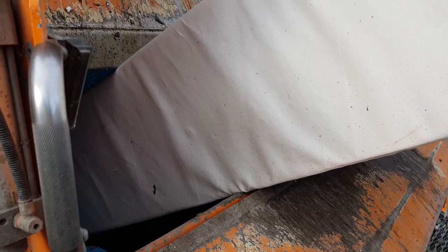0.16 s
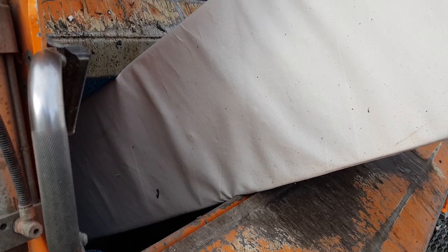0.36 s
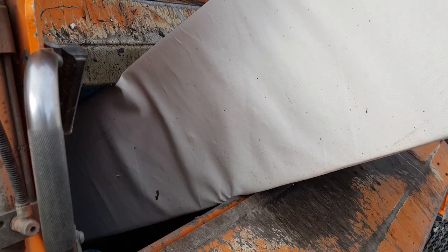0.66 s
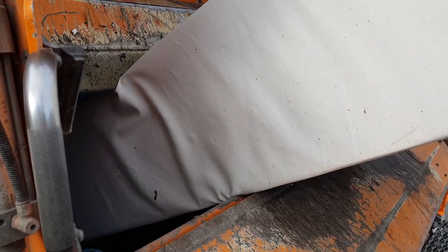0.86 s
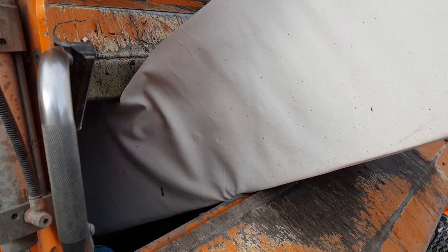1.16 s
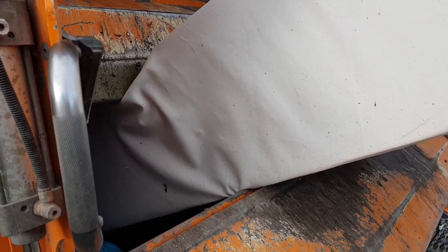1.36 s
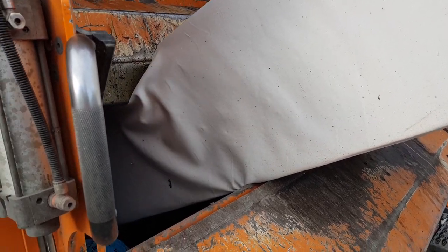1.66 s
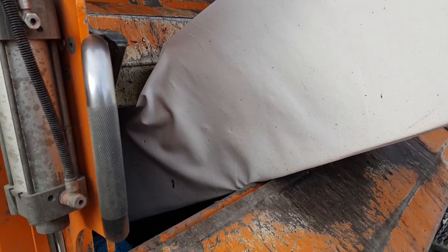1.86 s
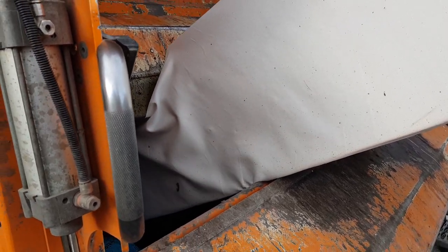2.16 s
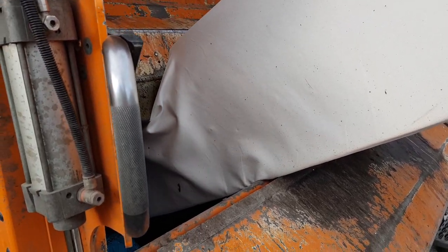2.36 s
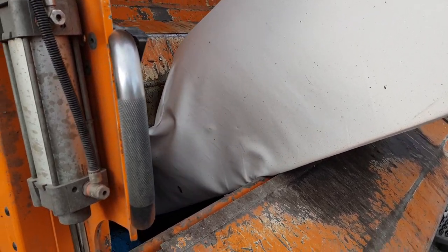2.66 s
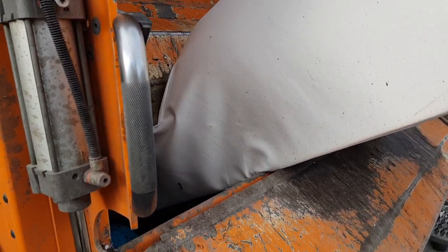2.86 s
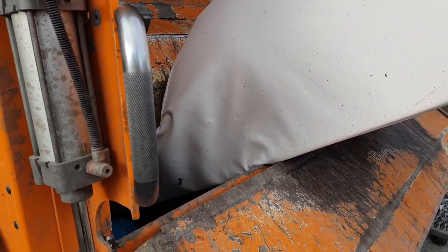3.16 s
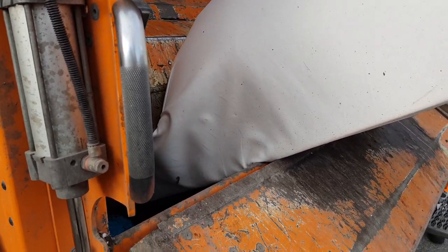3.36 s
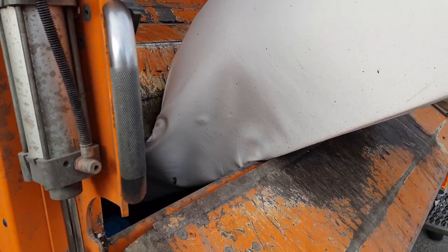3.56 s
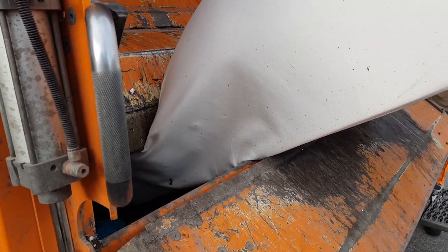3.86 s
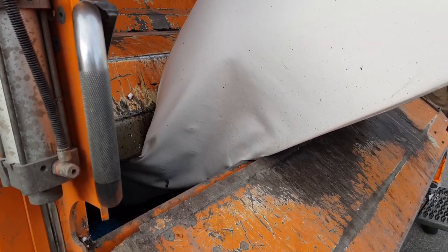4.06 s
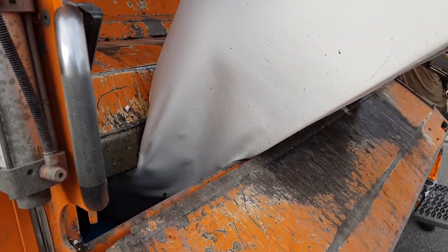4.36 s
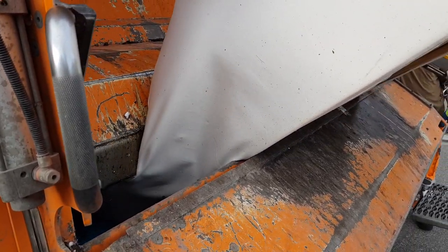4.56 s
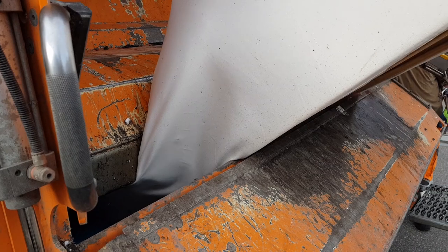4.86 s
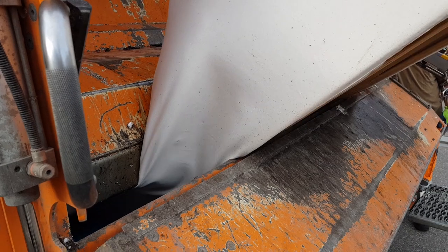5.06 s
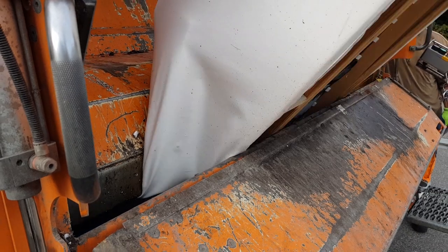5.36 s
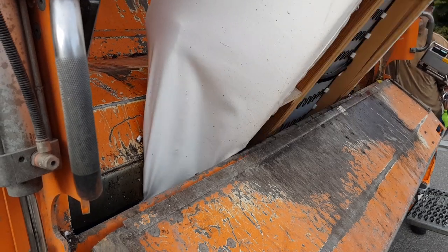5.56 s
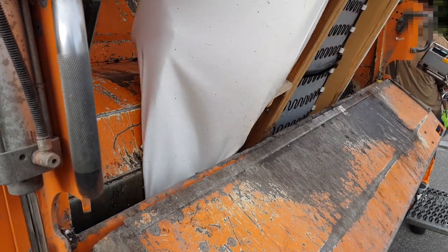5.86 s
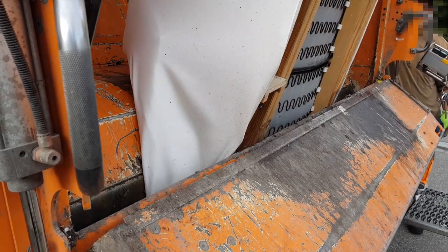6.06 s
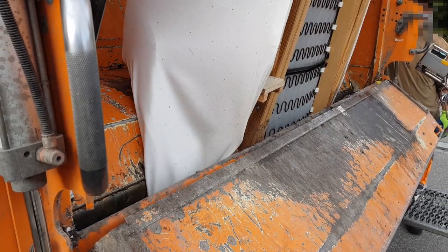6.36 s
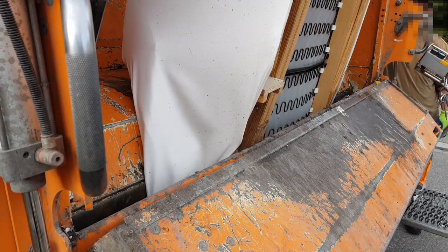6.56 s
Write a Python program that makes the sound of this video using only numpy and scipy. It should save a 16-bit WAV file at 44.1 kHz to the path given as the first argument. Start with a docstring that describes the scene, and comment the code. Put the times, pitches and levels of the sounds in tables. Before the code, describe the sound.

Wooden slats crack, crunch and splinter as a refuse truck's press crushes a cloth-covered bed base, over low engine rumble and faint pump whine.

```python
"""Wooden slats break as a refuse truck's packer blade crushes a cloth-covered bed base, heard beside the hopper.
Each break is a burst of fibre fractures that ring in the steel hopper; splinters add short, bright snaps.
Crushed pieces crunch as random tiny fractures, a joint creaks in noisy jerks and the frame groans in rough tones.
Cloth drags as dense, dull catches and panels boom as dying low tones.
Behind them, shaped noise and steady tones make the engine rumble, pump whine and oil hiss."""
import sys
import numpy as np
from scipy import signal
from scipy.fft import rfft, irfft
from scipy.io import wavfile

SR = 44100
rng = np.random.default_rng(int(sys.argv[2]) if len(sys.argv) > 2 else 0)


def to_wav(s):
    """Save 16-bit WAV."""
    ch = np.atleast_2d(s).T  # columns
    pcm = np.round(np.clip(ch, -1, 1) * 32767)  # PCM
    wavfile.write(sys.argv[1], SR, pcm.astype(np.int16))


N = 296352
TIME = np.arange(N) / SR  # seconds

# Levels in the tables are settings; the functions may add small trims to them.
# engine and chassis under load: (time [s], rumble level [dB], panel drone level [dB])
ENGINE_LOAD = [(0.0, -35, -37.5), (0.22, -22.5, -28.5), (0.99, -37, -27.5), (1.36, -30.5, -32.5),
               (1.53, -39, -38), (1.72, -31, -27), (2.43, -32, -37.5), (2.86, -33, -33),
               (4.2, -38.5, -27.5), (4.33, -35, -34.5), (4.75, -29.5, -26.5), (5.4, -28.5, -26),
               (5.93, -58, -25), (6.1, -36, -29), (6.31, -40, -40.5), (6.61, -22, -26.5),
               (6.72, -51, -31.5)]
# engine and pump effort: (time [s], firing tone level [dB], change of pump sound [dB])
ENGINE_EFFORT = [(0, -25.5, -0.5), (.4, -30, 0), (.8, -54, -7), (3.9, -37, -9), (6.72, -46, -10)]
# pump and valve tones: (frequency [Hz], level [dB])
WHINE_TONES = [(314, -54), (705, -49.5), (942, -46), (1222, -56), (1432, -50.5), (2320, -56.5), (3521, -62)]
# colour of the engine rumble: (frequency [Hz], level [dB per Hz])
RUMBLE_COLOUR = [(10, -25), (22, 9), (33, 16), (48, 18), (70, -7), (140, -54)]
# colour of the droning panels: (frequency [Hz], level [dB per Hz])
DRONE_COLOUR = [(30, -17), (65, 6.5), (110, 2.5), (160, -3), (240, -10.5), (400, -16), (1200, -44)]
# colour of oil hissing through the valves: (frequency [Hz], level [dB per Hz])
OIL_HISS_COLOUR = [(150, -1.5), (400, 3.5), (1000, -22), (1500, -3.5), (2600, -11.5), (3380, -5), (3530, 2),
                   (3700, -4.5), (4400, -5.5), (6500, -6), (10000, -14)]
# colour of the pump's rush through the steel body: (frequency [Hz], level [dB per Hz])
PUMP_RUSH_COLOUR = [(150, -18), (300, -13.5), (500, 4.5), (900, 2), (1400, -1.5), (2200, -15.5),
                    (5000, -32)]
PUMP_RUSH_DB = -38
FIRING_HZ = 95.2  # the engine's speed wanders slightly around this

# the load knocking on the hopper panels: (time [s], level [dB], pitch [Hz])
BOOMS = [(0.238, -22.5, 242), (0.748, -10, 74), (1.017, -10.5, 76), (1.12, -9.5, 77), (1.39, -14.5, 150),
         (1.617, -16.5, 76), (1.713, -16.5, 70), (1.764, -23.5, 188), (2.187, -10, 127),
         (2.297, -16.5, 125), (2.672, -12.5, 139), (2.683, -8, 68), (3.243, -11.5, 150), (3.801, -11, 118),
         (4.569, -6, 102.6), (4.708, -2.5, 62), (4.846, -7.5, 81), (5.19, -8, 69.4), (5.266, -6.5, 72.6),
         (5.881, -14.5, 122), (6.037, -8.5, 67.5)]
# cloth-covered side dragging over the hopper's lip: (time [s], length [s], level [dB])
DRAGS = [(1.666, 0.11, -38.5), (3.565, 0.13, -32.5), (4.109, 0.15, -26.5), (6.453, 0.099, -32.5)]
# colour of the dragging cloth: (frequency [Hz], level [dB per Hz])
DRAG_COLOUR = [(100, -8), (200, -4), (400, -4), (600, 0), (850, 2), (1150, -10), (1700, -20), (5000, -48)]
# the pinched frame groans, one list for each groan: (time [s], pitch [Hz], level [dB])
GROANS = [
    [(1.92, 1200, -54), (1.935, 1195, -24.5), (1.965, 1010, -43), (1.99, 840, -25.5), (2.015, 920, -55),
     (2.04, 1090, -51)],
    [(4.058, 594, -33), (4.092, 616, -25), (4.125, 623, -42)],
]
# a joint sticking and slipping: (time [s], slips [per s], level [dB])
CREAK = [(5.6, 77, -14), (5.62, 80, -32.5), (5.68, 88, -20), (5.77, 91, -27.5)]

# spells of crushing as the load gives way: (time [s], length [s], crunch level [dB], fibre crackle level [dB])
CRUSHES = [(0.6, 0.16, -22.5, -24.5), (0.825, 0.16, -24.5, -28.5), (1.042, 0.056, -23.5, -28.5),
           (1.248, 0.12, -33.5, -42), (1.95, 0.085, -32, -35), (2.116, 0.18, -21, -26.5),
           (2.352, 0.044, -24, -24), (2.503, 0.25, -27.5, -35.5), (2.8, 0.41, -40.5, -40.5),
           (3.267, 0.076, -34.5, -45), (3.985, 0.18, -35, -49), (4.464, 0.22, -29.5, -37.5),
           (4.879, 0.22, -32, -33.5), (5.153, 0.099, -21.5, -27.5), (5.343, 0.11, -20.5, -27.5),
           (5.48, 0.12, -29.5, -31.5), (5.783, 0.12, -27, -26.5), (5.967, 0.15, -30.5, -31.5),
           (6.196, 0.31, -60, -42), (6.608, 0.034, -36.5, -37.5)]
CRUSH_ATTACK_S, CRUSH_RISE_DB_PER_S, CRUSH_RELEASE_S = 0.016, 1, 0.034
STRAIN_CRUNCH_DB, STRAIN_CRACKLE_DB = -44.5, -49  # the load never quite rests between spells
FITS_PER_S, FIT_FALL_DB, FIBRES_PER_S = 24, 11, 1500  # crushing comes in fits of tiny fractures

# splinters snapping in the open: (time [s], level [dB])
SPLINTERS = [(0.5959, -15.5), (2.087, -21), (4.0377, -24.5), (4.4428, -12.5), (4.768, -16.5), (4.8305, -14),
             (5.003, -8.5), (5.015, -7), (5.0565, -6), (5.1623, -4.5), (5.335, -12), (5.378, -4.5),
             (5.4289, -5), (5.491, -10.5), (5.599, -8), (5.72, -14), (5.8044, -6.5), (6.029, -13.5),
             (6.1782, -16), (6.3168, -21), (6.368, -21), (6.397, -18.5), (6.412, -26), (6.4332, -11)]
# colour of a splinter: (frequency [Hz], level [dB per Hz])
SPLINTER_COLOUR = [(300, -21.5), (800, 0), (2200, -14), (4500, -0.5), (6600, 0), (7600, -5.5),
                   (10000, -11.5)]
# slats breaking and bumping: (time [s], knock level [dB], snap level [dB], pitch of the piece [Hz])
SLAT_BREAKS = [(0.256, -21.5, -34.5, 720), (0.437, -13, -25, 850), (0.521, -17.5, -16, 920),
               (0.594, -7, -16, 900), (0.62, -11, -17, 990), (0.661, -7, -17, 610), (0.712, -7.5, -23, 634),
               (0.752, -10.5, -33.5, 605), (0.77, -17.5, -33, 720), (0.836, -5.5, -31, 650),
               (0.853, -9, -31, 630), (0.91, -9.5, -20.5, 860), (0.977, -12, -24, 830),
               (1.082, -13.5, -25, 1130), (1.266, -8.5, -24, 1070), (1.393, -11, -21.5, 810),
               (1.761, -18.5, -46.5, 560), (1.842, -34, -39, 784), (1.927, -25, -28, 1160),
               (2.012, -29, -30.5, 890), (2.089, -4.5, -13, 1000), (2.115, -10.5, -18.5, 815),
               (2.173, -13, -25, 650), (2.192, -8, -11.5, 650), (2.259, -9, -16.5, 614),
               (2.345, -9.5, -15, 1010), (2.372, -10, -11, 1110), (2.424, -15.5, -21.5, 610),
               (2.474, -7, -14.5, 580), (2.549, -8.5, -13, 624), (2.609, -16.5, -17.5, 620),
               (2.655, -27, -31, 800), (2.674, -9.5, -44, 890), (2.714, -12.5, -18, 1170),
               (2.762, -19.5, -24.5, 585), (3.041, -12, -20.5, 990), (3.08, -10.5, -16.5, 606),
               (3.092, -6.5, -21, 1060), (3.25, -8, -16, 960), (3.442, -20, -32, 670),
               (3.696, -21, -30, 760), (3.725, -21.5, -31, 875), (3.804, -14.5, -25.5, 880),
               (3.836, -24.5, -29, 700), (3.962, -22.5, -29, 1000), (4.063, -12.5, -34.5, 715),
               (4.136, -21, -29, 549), (4.444, -4.5, -21.5, 940), (4.468, -9.5, -30, 920),
               (4.556, -5.5, -21, 840), (4.574, -11, -25, 630), (4.597, -7.5, -22.5, 950),
               (4.711, -9.5, -22.5, 726), (4.828, -2.5, -17, 690), (5.015, -5.5, -20, 950),
               (5.055, -11.5, -25, 950), (5.165, -5, -20, 940), (5.191, -3.5, -25.5, 870),
               (5.219, -17, -17, 790), (5.234, -7, -26, 780), (5.264, -5, -14, 740),
               (5.335, -5, -15.5, 770), (5.356, -8.5, -17.5, 864), (5.468, -14, -21.5, 810),
               (5.599, -18, -20, 890), (5.62, -12.5, -39.5, 760), (5.701, -13, -38, 500),
               (5.765, -7, -15.5, 830), (5.808, -8.5, -15, 800), (5.833, -11.5, -21, 820),
               (6.432, -17, -31, 705)]
# colour of the woody knock: (frequency [Hz], level [dB per Hz])
KNOCK_COLOUR = [(100, -19), (230, -4.5), (310, -3), (410, -3.5), (510, -0.5), (630, 1.5), (820, 2.5),
                (1300, -4), (1900, -11.5), (2800, -21.5), (6000, -57.5)]
# colour of the sharp snap: (frequency [Hz], level [dB per Hz])
SNAP_COLOUR = [(500, -26), (1200, -13.5), (1800, 1), (2900, -1), (4300, 0.5), (6400, -2), (7400, -8.5),
               (10000, -15)]
# colour of the shaken frame: (frequency [Hz], level [dB per Hz])
THUD_COLOUR = [(35, -3), (80, 1.5), (135, 7.5), (190, -2.5), (250, -10), (325, -6.5), (430, -14),
               (700, -16), (2000, -76)]
# the frame is bent against the hopper, then tips up out of it, so the reflections and thud change:
# (time [s], reflection setting [dB], thud setting against knock [dB], length scale of a tear [s])
FRAME_DEPTH = [(0.6, 6, -12, 0.0098), (0.85, 8.5, -19, 0.012), (1.3, -1.5, -13.5, 0.008),
               (2.5, -2, -7, .013), (3.8, 5.5, -11, 0.0071), (4.45, 10.5, -15, 0.00496),
               (4.6, -0.5, -3, 0.0078), (4.85, 14, -23.5, 0.00803), (5.3, 1.5, -14, 0.0084),
               (5.7, 0, -8.5, 0.0095), (6.4, -1, -24, 0.0046)]
BUMP_OVER_DB = 21  # a knock set this far above its snap starts to turn into a soft bump

# ring of the hopper: (frequency [Hz], time to fall by 60 dB [s])
HOPPER_RING = [(120, 0.35), (700, 0.33), (1900, 0.18), (8000, 0.28)]
# ringing tones of the hopper's steel plates: (frequency [Hz], level [dB])
STEEL_MODES = [(322, -23), (622, -27), (2484, -24.5), (2668, -23.5), (4205, -23.5), (4846, -45),
               (6133, -32)]
STEEL_T60_S = 0.086  # time for a plate's ring to fall by 60 dB
STEEL_DETUNE = 0.01  # the load strains the plates: spread of a mode's pitch, as a share
# shading of the left microphone: (frequency [Hz], left minus right [dB])
LEFT_SHADE = [(120, -0.5), (250, 0.5), (500, -6), (1000, -3.5), (2000, -4.5), (4000, -4), (8000, -0.5)]
MIC_TOP_HZ, TOP_HZ = 10150, 16000  # low-pass edges before and after clipping


def undb(db):
    """Turn decibels into gain."""
    return 10 ** (np.asarray(db) / 20)


def unit(x):
    """Scale to an rms of 1."""
    return x / np.sqrt(np.mean(x ** 2) + 1e-18)


def blow(x):
    """Scale a short sound to the energy of 10 ms at an rms of 1."""
    return x * np.sqrt(SR / 100 / (np.sum(x ** 2) + 1e-18))


def curves(table):
    """Join the points of a time table with straight lines, one value per sample."""
    s, *columns = np.transpose(table)
    return [np.interp(TIME, s, column) for column in columns]


def along(points, hz):
    """Read a frequency table on a logarithmic pitch axis."""
    f, value = np.transpose(points)
    return np.interp(np.log(hz + 1), np.log(f), value)


def response(points, size=8192):
    """Make a filter of the given colour that starts at once, with no sound before the blow."""
    level_db = along(points, np.fft.rfftfreq(size, 1 / SR))
    cepstrum = irfft(np.log(undb(level_db)))
    # folding the second half onto the first gives minimum phase
    cepstrum[1:size // 2] *= 2
    cepstrum[size // 2 + 1:] = 0
    return np.exp(rfft(cepstrum))


def colour(x, points):
    """Filter by a colour, then scale to an rms of 1."""
    return unit(signal.oaconvolve(x, irfft(response(points)))[:N])


def add(track, s, x):
    """Mix in a short sound at time s."""
    i = max(int(s * SR), 0)
    track[..., i:i + x.shape[-1]] += x[..., :N - i]


def grains(size, rate, spread_db):
    """Random tiny fractures, most weak and a few strong."""
    fires = rng.random(size) < rate / SR
    sign = rng.choice([-1, 1], size)
    strength = np.minimum(rng.exponential(size=size), 4)
    return fires * sign * undb(spread_db * strength)


def walk(rate):
    """Slow random wander with a spread near 1, through `rate` new values per second."""
    steps = rng.standard_normal(1024)
    return np.interp(TIME * rate, np.arange(len(steps)), steps)


def pair(points, side_db):
    """Coloured noise at two microphones: a shared part and a part opposite in the two."""
    mid, side = (colour(rng.standard_normal(N), points) for _ in range(2))
    return mid + undb(side_db) * np.array([side, -side])


def hopper(x, wet_db, alike_hz=470, size=8192):
    """One spot in the hopper: direct sound plus steel reflections; long waves are most alike in both ears."""
    t, hz = np.arange(size) / SR, np.fft.rfftfreq(size, 1 / SR)
    mid, side = rfft(rng.standard_normal((2, size)))
    apart = 1 / np.sqrt(1 + (alike_hz / (hz + 1)) ** 3)
    ears = np.array([[1], [-1]])
    field = (mid + ears * apart * side) / np.sqrt(1 + apart ** 2)
    centres, t60s = np.transpose(HOPPER_RING)
    tail = 0
    for share, t60 in zip(np.eye(len(centres)), t60s):
        # the nearest walls answer at once, the rest rings on
        fade = undb(-60 * t / t60) + 2.04 * np.exp(-t / 0.0018)
        band = np.interp(np.log(hz + 1), np.log(centres), share)
        tail = tail + irfft(field * band) * fade / np.linalg.norm(fade)
    # every spot rings the same plates, with its own phases and slightly different pitches
    fade = undb(-60 * t / STEEL_T60_S)
    for mode_hz, db in STEEL_MODES:
        strained_hz = mode_hz * (1 + STEEL_DETUNE * rng.standard_normal())
        ring = np.sin(2 * np.pi * (strained_hz * t + rng.random((2, 1))))
        tail = tail + undb(db) * np.sqrt(2) * ring * fade / np.linalg.norm(fade)
    tail = tail * undb(wet_db)
    # the direct wave reaches the right microphone first, the left 5 to 10 samples later
    tail[0, rng.integers(5, 11)] += 1
    tail[1, 0] += 1
    heard = signal.fftconvolve(x[None], tail, axes=1)
    # equally loud from every spot
    return heard * np.sqrt(2 * np.sum(x ** 2) / (np.sum(heard ** 2) + 1e-18))


def shade(x):
    """The left microphone faces away from the load, which changes its tone."""
    half_db = along(LEFT_SHADE, np.fft.rfftfreq(N, 1 / SR)) / 2
    return irfft(rfft(x) * undb([half_db, -half_db]), N)


def machine():
    """Engine rumble and firing tone, droning panels, pump whine and rush, and oil hissing through valves."""
    rumble_db, drone_db = curves(ENGINE_LOAD)
    hum_db, pump_db = curves(ENGINE_EFFORT)
    turns = np.cumsum(1 + 0.001 * walk(13.0)) / SR  # time stretched by small speed changes
    rumble = pair(RUMBLE_COLOUR, side_db=-20.0) * undb(rumble_db + 1.5)
    drone = pair(DRONE_COLOUR, side_db=-20.5) * undb(drone_db)
    firing = np.sqrt(2) * np.sin(2 * np.pi * FIRING_HZ * turns) * undb(hum_db + 1.3 * walk(14))
    whine = 0
    for hz, db in WHINE_TONES:
        # each tone reaches the microphones by its own paths
        phase = 2 * np.pi * hz * turns + np.array([walk(0.98), walk(1.0)])
        whine = whine + np.sqrt(2) * np.sin(phase) * undb(db + pump_db + 4.2 * walk(5.4))
    hiss = pair(OIL_HISS_COLOUR, side_db=0.5) * undb(pump_db - 38.5)
    rush = pair(PUMP_RUSH_COLOUR, side_db=-0.5) * undb(PUMP_RUSH_DB + pump_db)
    return rumble + drone + firing + whine + hiss + rush


def panels(size=16384):
    """A shove sets a hopper panel swinging in low tones that soon die away."""
    t, out = np.arange(size) / SR, np.zeros(N)
    for s, db, pitch_hz in BOOMS:
        swing = np.sin(2 * np.pi * pitch_hz * t) + 0.14 * np.sin(2 * np.pi * 1.62 * pitch_hz * t)
        # the whole body rocks on its springs
        sway = 0.17 * np.sin(2 * np.pi * 31 * t) * np.exp(-t / 0.086)
        onset = 1 - np.exp(-t / 0.0054)
        boom = (swing * np.exp(-t / 0.014) + sway) * onset
        add(out, s, undb(db - 2.5) * blow(boom))
    return out


def drags():
    """Cloth over wood rubs along the steel in dense, dull catches that swell and fade."""
    pressure = np.zeros(N)
    for s, length_s, db in DRAGS:
        pressure += undb(db) * np.sin(np.pi * np.clip((TIME - s) / length_s, 0, 1))
    catches = colour(grains(N, rate=1000, spread_db=5.0), DRAG_COLOUR)
    return hopper(catches * pressure, wet_db=2.0)[:, :N]


def groans():
    """Wood rubs on steel with a rough tone whose pitch follows the pinch."""
    tone = np.zeros(N)
    for groan in GROANS:
        hz, db = curves(groan)
        rubbing = (TIME > groan[0][0]) & (TIME < groan[-1][0])
        phase = 2 * np.pi * np.cumsum(hz * (1 + 0.05 * walk(150))) / SR
        tone += (np.sin(phase) + 0.16 * np.sin(2 * phase)) * undb(db + 1.4 * walk(130)) * rubbing
    return hopper(tone, wet_db=-18)[:, :N]


def creak():
    """A joint slips in separate jerks, each a tiny rasp that rings the wood."""
    rate, db = curves(CREAK)
    sliding = (TIME > CREAK[0][0]) & (TIME < CREAK[-1][0])
    phase = np.cumsum(rate * np.exp(0.12 * walk(70))) / SR % 1  # from 0 to 1 in each jerk
    slips = np.exp(-phase / 0.17) * rng.standard_normal(N)
    rasp = colour(slips, SNAP_COLOUR) + undb(-1.5) * colour(slips, KNOCK_COLOUR)
    return hopper(rasp * undb(db) * sliding, wet_db=0.5)[:, :N]


def crushing():
    """Strength of crunch and crackle: each spell swells, creeps up while the load gives way and dies away."""
    crunch_power, crackle_power = undb(2 * STRAIN_CRUNCH_DB), undb(2 * STRAIN_CRACKLE_DB)
    for s, length_s, crunch_db, crackle_db in CRUSHES:
        age = np.maximum(TIME - s, 0)
        spell = np.minimum(age / CRUSH_ATTACK_S, 1) * undb(CRUSH_RISE_DB_PER_S * age)
        spell = spell * np.exp(-np.maximum(age - length_s, 0) / CRUSH_RELEASE_S)
        crunch_power = crunch_power + (spell * undb(crunch_db)) ** 2
        crackle_power = crackle_power + (spell * undb(crackle_db)) ** 2
    return np.sqrt(crunch_power), np.sqrt(crackle_power)


def crunch(crunch_gain, crackle_gain, size=12288):
    """Crushed wood and cloth grind on in fits between the breaks, now here, now there."""
    # strain builds and lets go: each fit starts at once and dies away
    fit = np.cumsum(FITS_PER_S * np.exp(0.36 * walk(20))) / SR % 1
    fibres = grains(N, rate=FIBRES_PER_S, spread_db=4.0) * undb(-FIT_FALL_DB * fit)
    crunching = colour(fibres, KNOCK_COLOUR) * crunch_gain
    crackling = colour(fibres, SNAP_COLOUR) * crackle_gain * undb(2.5)
    sound = crunching + crackling
    out = np.zeros((2, N))
    for i in range(0, N, size):  # each block sounds from a new spot
        add(out, i / SR, hopper(sound[i:i + size], wet_db=1.5))
    return out


def splinters(size=8192):
    """Short, bright snaps from the exposed side of the frame, each a fast dying run of fractures."""
    t, bright, out = np.arange(size) / SR, response(SPLINTER_COLOUR), np.zeros((2, N))
    for s, db in SPLINTERS:
        # the two microphones see different faces of the splinter
        run = np.array([grains(size, rate=7200, spread_db=2.0) for _ in range(2)]) * np.exp(-t / 0.0018)
        snap = undb(db - 8.5) * np.array([blow(ear) for ear in irfft(rfft(run) * bright)])
        add(out, s, snap)
        add(out, s + 0.0042, undb(-6.0) * hopper(snap[0], wet_db=12))  # the hopper's answer
    return out


def slats(size=8192):
    """A dying run of fractures snaps, rings the piece and shakes the frame; little snap makes a dull bump."""
    t, hz = np.arange(size) / SR, np.fft.rfftfreq(size, 1 / SR) + 1
    knock, snap, thud = response(KNOCK_COLOUR), response(SNAP_COLOUR), response(THUD_COLOUR)
    wood = np.zeros((2, N))
    wet_db, heft_db, tear_s = curves(FRAME_DEPTH)
    for s, knock_db, snap_db, pitch_hz in SLAT_BREAKS:
        now = int(s * SR)
        age = t / max(tear_s[now], .001)
        run = grains(size, rate=3400, spread_db=3.5) * (0.37 + 0.92 * age) * np.exp(-1.6 * age)
        run[0] += 0.9  # the first fibre gives way
        run = rfft(run)
        # the piece bends back and knocks a moment after the snap
        resonance = 1 + 1.04 / (1 + 1j * 4 * (hz / pitch_hz - pitch_hz / hz))
        piece = resonance * np.exp(-2j * np.pi * hz * 0.001429)
        # one firm push as the piece lets go, part way through the tear
        recoil = 1.47 * np.exp(-2j * np.pi * hz * 0.3073 * tear_s[now])
        # a soft bump has fewer fractures and a duller push
        soft = np.clip((knock_db - snap_db - BUMP_OVER_DB) / 10, 0, 1)
        push = (run * (1 - soft / 2) + recoil) / (1 + 1j * hz / pitch_hz) ** (2 * soft)
        parts = [(push * knock * piece, knock_db - 3.5),
                 (run * snap, snap_db + 3.5),
                 (run * thud, knock_db + heft_db[now] + 2.5)]
        for spectrum, db in parts:
            sound = undb(db) * blow(irfft(spectrum))
            add(wood, s - .002, hopper(sound, wet_db[now]))
    return wood


def scene():
    """Everything at the hopper's mouth, from the machine to the breaking wood."""
    background = machine() + panels()
    wood = drags() + groans() + creak() + crunch(*crushing()) + splinters() + slats()
    return background + shade(wood)


def record(dry):
    """A narrow-band microphone channel that clips peaks beyond full scale; nothing below about 12 Hz is kept."""
    heard = signal.sosfilt(signal.butter(2, 12, "highpass", fs=SR, output="sos"), dry)
    heard = signal.sosfilt(signal.ellip(10, .2, 80, MIC_TOP_HZ, fs=SR, output="sos"), heard)
    clipped = np.clip(heard, -1, 1)
    return signal.sosfilt(signal.ellip(8, .2, 70, TOP_HZ, fs=SR, output="sos"), clipped)


dry = scene()
out = record(dry)
to_wav(out)
```